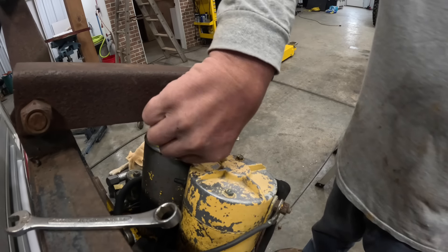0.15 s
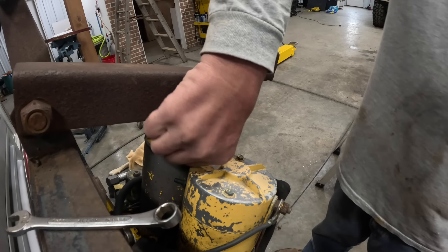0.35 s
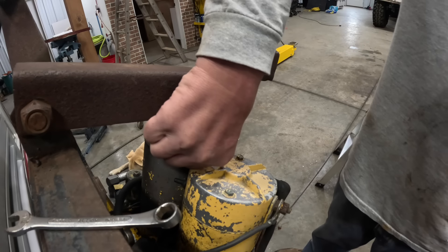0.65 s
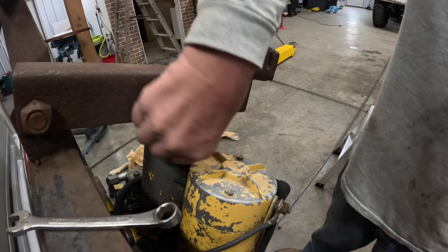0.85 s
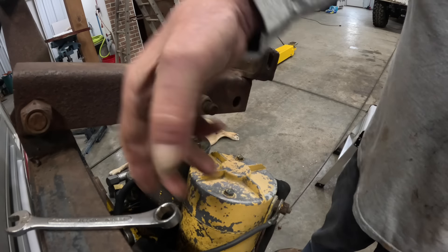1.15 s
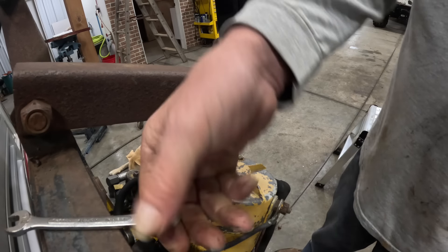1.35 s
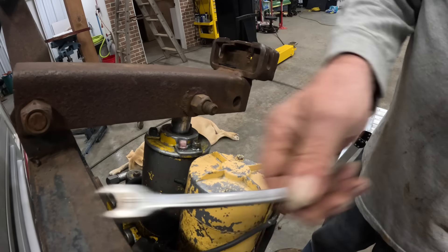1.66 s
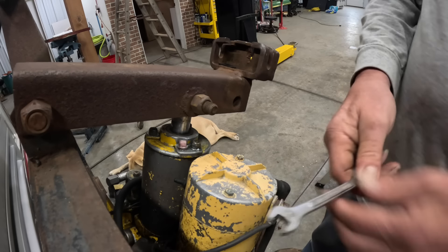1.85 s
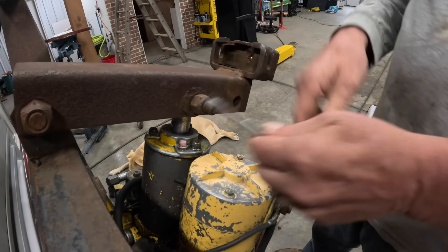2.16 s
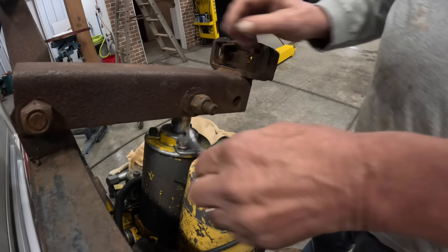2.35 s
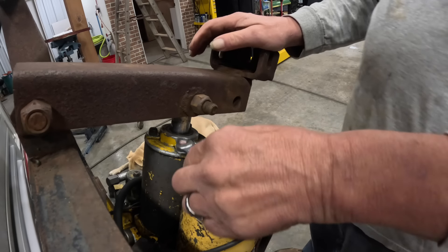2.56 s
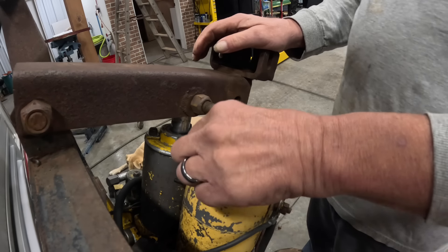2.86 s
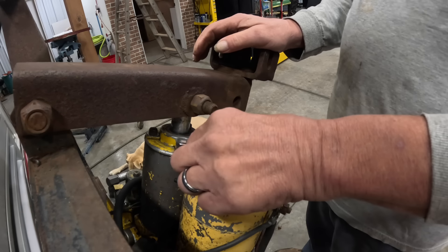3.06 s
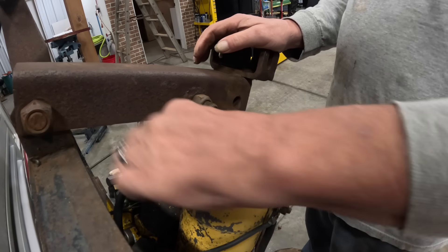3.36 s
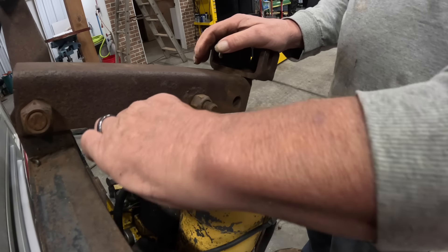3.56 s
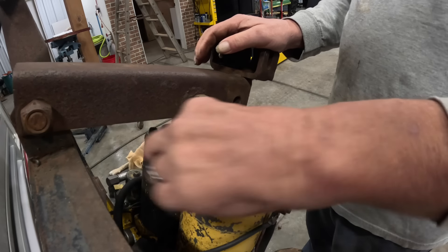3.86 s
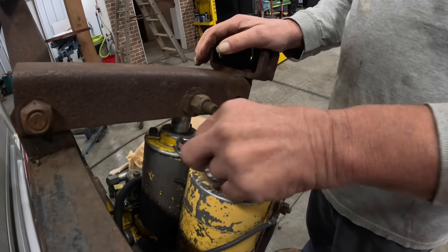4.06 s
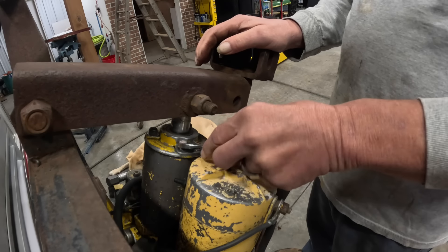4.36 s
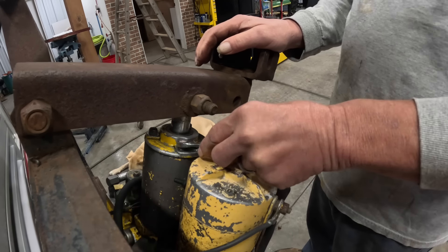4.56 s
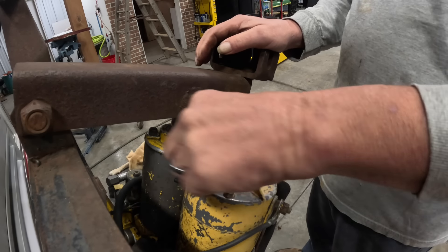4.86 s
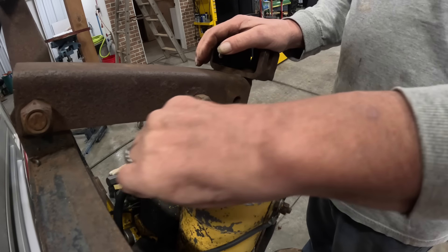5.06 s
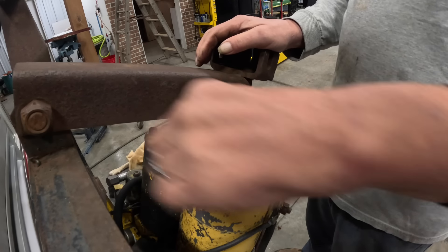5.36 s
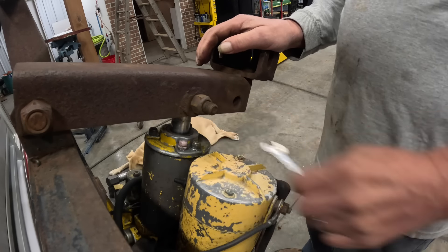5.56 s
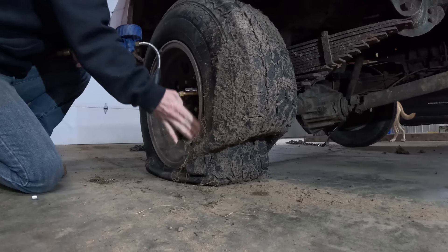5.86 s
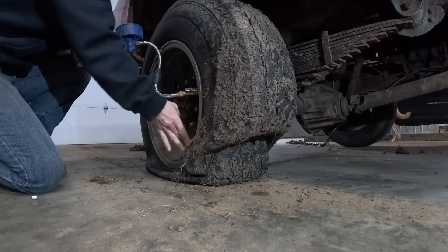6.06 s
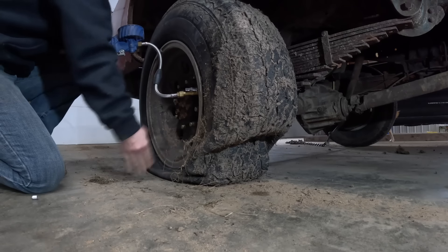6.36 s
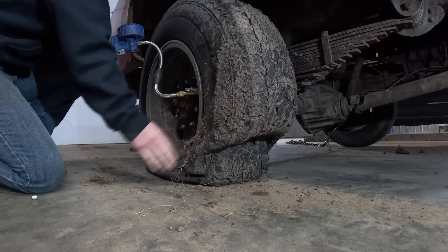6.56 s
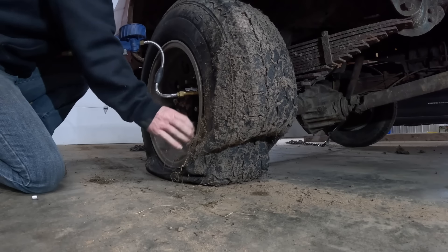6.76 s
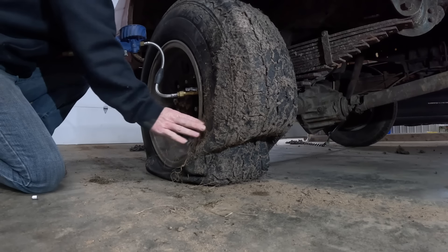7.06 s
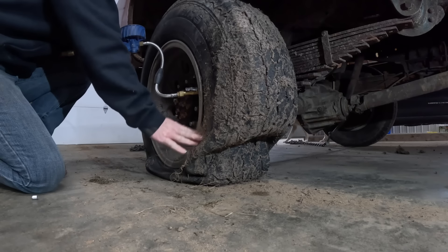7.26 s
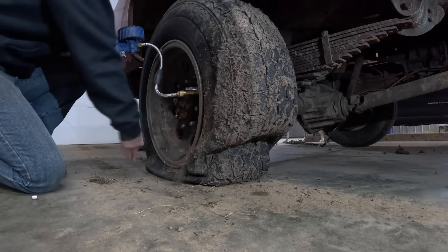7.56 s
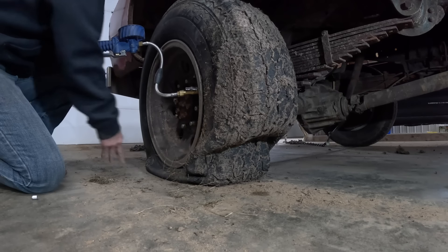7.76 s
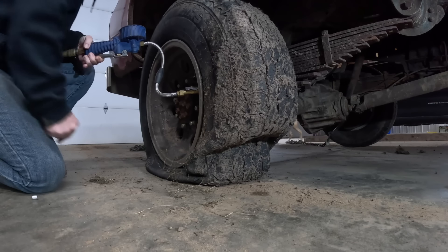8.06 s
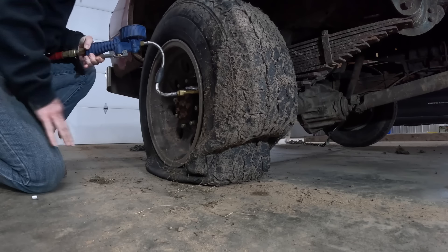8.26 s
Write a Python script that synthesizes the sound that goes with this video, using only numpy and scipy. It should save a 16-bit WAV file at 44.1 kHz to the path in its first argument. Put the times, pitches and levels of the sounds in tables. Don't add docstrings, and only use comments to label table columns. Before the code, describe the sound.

A motor hums low while hands rub and clink a steel wrench, then air spits sharply and hisses steadily into a flat tire.

```python
import sys
import numpy as np
from scipy import signal
from scipy.fft import rfft, irfft, next_fast_len
from scipy.io import wavfile

SR = 44100
rng = np.random.default_rng(int(sys.argv[2]) if len(sys.argv) > 2 else 0)


def linear_from_db(decibels):
    return 10 ** (np.asarray(decibels, float) / 20)


def unload_wav(signal):
    wavfile.write(
        sys.argv[1],
        SR,
        np.round(np.clip(np.atleast_2d(signal).T, -1, 1) * 32767).astype(np.int16),
    )


N = 371322
T = np.arange(N) / SR
CUT_S = 5.722

# [t/s, level/dB]
GUSTS = [
    (0, -47),
    (.26, -52),
    (.82, -54.5),
    (1.48, -67),
    (2.7, -57),
    (3.3, -59),
    (5.3, -63),
    (6.15, -57),
]
GUST_RISE_DB_S, GUST_FALL_DB_S, STILL_SHOP_DB, STILL_GARAGE_DB = 92, 91, -73.5, -77.5
# [f/Hz, level/dB]
SHOP_DRAUGHT = [(8, -4), (30, -1), (45, -5), (75, -2), (90, -12), (110, -16)]
GARAGE_DRAUGHT = [(8, -25.0), (30, 9.5), (50, -2.0), (100, -23.0)]
# [f/Hz, L-R level/dB]
DRAUGHT_ALIKE, DRAUGHT_LEAN = [(10, 0.91), (100, 0.9)], [(10, -1.0), (100, -2.0)]
# [f/Hz, level/dB per Hz]
GARAGE_COLOUR = [(53, -50), (90, -22), (118, -20), (157, -2.5), (195, -8.5), (251, -4.5), (265, -4.5),
                 (739, -23), (829, -6), (1100, -16), (1430, -10), (2420, -120)]
# [t/s, level/dB]
STIRS = [
    (5.8, -59),
    (7.6, -65),
]
STIR_FADE_DB_S, HUSH_DB = 17, -71.5
# [f/Hz, width/Hz, level/dB]
FAR_PUMP = (858, 12, -84)
# [f/Hz, level/dB per Hz]
SHOP_AIR = [(530, -25), (900, -17), (1040, 2), (1230, 0.5), (1590, -1), (2120, -8), (2470, -1.5),
            (3290, -1.5), (4490, -12.5), (8740, -11), (10600, -20), (12800, -19.5), (15500, -43)]
SHOP_AIR_DB, SHOP_T60_S = -69, 0.39
# [f/Hz, L-R level/dB]
SHOP_ALIKE = [(60, 0.6), (130, 1), (290, 0.77), (640, 0.1), (1410, 0.44), (3500, 0.13), (5600, 0.87),
              (9300, .97), (10800, 0.32), (15000, 0.5)]
SHOP_LEAN = [(60, 7), (180, -1.5), (550, 4), (1650, 2), (4970, 0.5), (9300, 1.5), (12000, 11), (15000, 8)]

SHAFT_HZ = 16.655
# [multiple of the shaft rate, level/dB rms]
MOTOR_LINES = [(11, -72.5), (13, -66.5), (15, -72.5), (20, -77.5), (22, -74), (24, -81.5), (30, -58),
               (33, -87), (36, -69.5), (37, -64.5), (39, -69.5), (40, -73), (41, -71.5), (45, -82.5)]
# [f/Hz, level/dB per Hz]
CASING = [(53, -43), (90, -47), (108, -20.5), (178, 3), (222, -2.5), (308, -10.5), (360, -9), (460, -10.5),
          (481, -6.5), (497, -11.5), (538, -8.5), (601, -7), (680, -13.5), (786, -26.5), (1300, -28.5),
          (1690, -65), (2860, -120)]
CASING_DB = -56
# [f/Hz, width/Hz, level/dB]
BEARING = (3390, 40, -81.5)
SHADED_S, SHADE_DB = 3.48, -1.5

# [t/s, level/dB]
DRAG = [
    (7.22, -69),
    (7.26, -55.5),
    (7.4, -49),
    (7.495, -42.5),
    (7.53, -58),
    (7.7, -91),
]
# [f/Hz, level/dB per Hz]
DRAG_COLOUR = [(65, -52), (110, -37), (156, 1), (275, -4), (322, -9), (425, -1), (499, -3), (537, -8),
               (796, -22), (915, -9.5), (1400, -15), (1820, -44), (3080, -120)]
GRIT = [(1500, -2), (3000, -5), (5000, -1.5), (9000, -1.5), (12000, -17), (15500, -19)]
# [f/Hz, L-R level/dB]
PALM_ALIKE = [(100, 1), (1500, .94), (3500, 0.88), (4500, 1), (9000, 1), (12000, .8)]
PALM_LEAN = [(100, -1), (1500, -2.5), (4500, -0.5), (9000, 1.5), (12000, 5)]

# [t/s, sleeve level/dB, fingertips against sleeve/dB, fade/dB per s]
HANDS = [
    (0, -65.5, -5.5, 60),
    (.14, -69, -14, 30),
    (.3, -64.5, -19, 33),
    (.92, -71, -4, 34),
    (1.95, -67, -3, 37),
    (2.57, -69, -4, 28),
    (3.3, -69.5, -9, 45),
    (4.2, -75.5, 0, 9.5),
    (5.65, -70, -6, 18),
]
HANDS_REST_DB = -83
# [f/Hz, level/dB per Hz]
SLEEVE = [(700, -18), (1200, -0.5), (2000, -3), (3000, -3), (4500, -12.5), (7000, -29.5)]
FINGER = [(3500, -15.5), (5500, 0), (7500, 0.5), (9000, 0.5), (10500, -19), (14000, -21)]
# [t/s, peak level/dB, centre f/Hz]
TICKS = [(0.191, -49, 1800), (0.2068, -49, 6460), (0.2072, -52, 2800), (0.758, -49.5, 7400),
         (0.95, -53, 8340), (1.4624, -46, 3000), (1.467, -52, 4500), (1.4745, -52, 6800),
         (1.488, -54, 5000), (1.925, -48.5, 8700), (3.0525, -44, 6640), (3.064, -53, 5500),
         (3.092, -57, 7500), (3.167, -61, 6500), (3.7502, -28, 2600), (4.2177, -52, 1950),
         (5.2864, -38, 2600), (4.604, -55, 4000), (7.495, -34, 3100), (7.5852, -38, 3600)]
TICK_SHARE, TICK_T60_S = 0.89, 0.025
# [t/s, peak level/dB, centre f/Hz]
KNOCKS = [(1.465, -46, 1150), (1.472, -52, 2200), (1.484, -50, 1600), (3.054, -43.5, 980),
          (3.37, -56, 1450), (3.694, -55.5, 1300), (4.05, -49, 1160), (4.248, -48, 716.8),
          (4.362, -49.5, 1250), (4.425, -50, 726), (5.225, -46, 780), (5.235, -53, 1500),
          (5.79, -48.5, 185), (5.89, -51.5, 190), (6.0, -53, 238), (7.39, -45, 220), (7.425, -42.5, 480),
          (7.484, -42, 470), (7.493, -38.5, 200), (7.495, -37, 1040), (7.817, -44.5, 1220),
          (8.39, -56.5, 190)]
KNOCK_SHARE, KNOCK_T60_S = 0.4, 0.13
# [t/s, peak level/dB, centre f/Hz]
BOOMS = [
    (2.44, -60, 1150),
    (3.06, -45, 450),
    (3.755, -48, 2700),
    (3.757, -55.5, 1400),
    (7.58, -54, 190),
]
BOOM_SHARE, BOOM_T60_S = 0.32, 0.44
# [t/s, peak level/dB, centre f/Hz]
SLIPS = [(.2085, -53, 8400), (2.875, -59, 6800), (4.078, -57, 9200), (4.104, -55, 9000), (4.122, -56, 8300),
         (4.133, -57, 9500), (4.202, -64, 9500), (4.245, -57, 8000), (4.3, -56, 9300), (4.311, -61, 9300),
         (4.322, -56, 9400), (4.34, -63, 9090), (4.502, -57, 7600), (4.52, -62, 9500), (4.543, -65, 7400),
         (4.562, -59, 7600), (4.604, -54.5, 7700)]
SLIP_SHARE, SLIP_T60_S = 0.19, .025
# [t/s, level/dB, f/Hz, length/s]
SQUEAKS = [(.955, -65, 8700, 0.027), (.2, -63, 8500, 0.032), (2.3, -70, 1900, 0.099),
           (2.94, -62.5, 1190, 0.11), (3.1, -66.5, 1230, 0.17), (2.795, -61.5, 8300, 0.026),
           (2.85, -63.5, 8400, 0.051), (3.67, -71, 9300, .033), (4.5, -70, 9130, 0.035),
           (4.32, -71, 9200, 0.04), (2.6, -63, 1840, .03), (2.8, -64, 1340, .03), (2, -70, 1900, .05),
           (5.212, -72, 8600, .015)]
# [t/s, level/dB, f/Hz, length/s]
SCUFFS = [
    (.47, -68, 2890, 0.078),
    (.9, -62, 2460, 0.045),
    (1.478, -67, 5000, 0.041),
    (1.17, -71, 7900, 0.13),
    (1.95, -68, 3460, 0.13),
    (2.17, -71.5, 7000, 0.062),
    (2.28, -69.5, 7200, 0.08),
    (2.6, -66, 2440, 0.057),
    (4.52, -72.5, 8700, 0.05),
]
SQUEAK_SHARE, SCUFF_SHARE = 0.17, 0.71
# [t/s, level/dB, f/Hz, length/s]
WHISTLES = [
    (.34, -75, 7500, 0.055),
    (.885, -68, 7440, 0.041),
    (2.6, -62.5, 7500, 0.057),
    (2.58, -71, 6100, .03),
    (2.93, -70, 1170, .08),
]
WHISTLE_SHARE = 0.035
# [t/s, level/dB, f/Hz, t60/s]
THUDS = [(1.463, -48, 850, .07), (1.464, -51, 1550, 0.081), (1.464, -55, 2864, .03),
         (1.47, -47, 878, 0.065), (1.476, -47, 1986, .03), (1.486, -48, 800, .04),
         (2.773, -52, 1280, 0.046), (3.053, -41, 800, .04), (3.053, -47, 1320, 0.042),
         (3.053, -51, 1800, .03), (3.054, -40, 530, .05), (3.068, -40, 497, 0.065),
         (3.063, -40.5, 756, 0.082), (3.097, -46, 497, 0.12), (3.1, -45, 179, .25),
         (7.492, -33.5, 950, 0.049), (7.4905, -28.5, 490, .045), (7.496, -42, 1400, .04),
         (3.165, -48, 590, .04), (3.7423, -38.5, 1346, .025), (3.7418, -38, 2230, .022),
         (3.7503, -29, 2260, .024), (4.0465, -51, 2261, .025), (5.2865, -32, 2220, .026)]
# [t/s, level/dB, f/Hz, length/s]
HELD = [
    (4.0458, -42, 3550, 0.019),
    (5.2875, -39, 3544, 0.01),
]
HELD_T60_S, GRIP_S = .1, .003

# [t/s, peak level/dB, free ring/dB, crack/dB]
CLINKS = [(2.773, -50, -28, -5), (3.6945, -51, -24, -12), (3.7164, -52., -29, -14.),
          (3.7416, -18, -33, -24), (3.7501, -11.5, -37, -12.5), (3.7535, -23, -21, -2),
          (3.7824, -42.5, -2.5, -20), (4.0457, -43, -28, -4), (4.0554, -46., -24, -5),
          (4.3615, -41.5, -37.5, -10), (5.223, -31.5, -36, -12), (5.2394, -52, -25, -15),
          (5.2862, -26, -37.5, -1.5)]
# [f/Hz, level/dB, t60/s]
GRIPPED = [(1350, -12.5, 0.066), (2260, -9, 0.031), (3550, 3, 0.032), (6790, 4.5, 0.02),
           (8510, -22.5, 0.0093), (11900, -19.5, 0.011), (12300, -35, 0.013)]
FREE = [(2940, -18, .3), (3515, -27, .6), (3570, -25, .15), (6385, -10, .8), (6700, -11, .25),
        (6810, -13, .35), (7040, -11, .12)]
CONTACT_S = 0.0026
EVEN_BLOW_DB, BRIGHTER_PER_DB = -35, 0.4423
# [t/s, level/dB, f/Hz, t60/s]
PINGS = [(1.463, -60, 11550, .06), (1.463, -62, 12500, .05), (1.466, -62, 5760, .04),
         (1.472, -60, 7380, .05), (1.476, -72, 11550, 0.17), (3.053, -57, 6700, .05),
         (3.055, -57, 3500, .05), (3.7503, -37.5, 2500, 0.02), (3.753, -43.5, 4716, 0.2),
         (3.7505, -29, 5980, 0.028), (3.751, -32, 9090, .015), (3.7565, -30.5, 6350, 0.055),
         (3.7504, -38, 2970, .03), (5.2864, -39, 2935, 0.025), (5.3, -58.5, 6385, 0.66),
         (5.24, -55, 3550, .05), (5.25, -60, 6820, .1), (3.6985, -54.5, 3545, .06), (3.77, -55, 6385, .9),
         (3.76, -58, 3521, 0.73), (4.0462, -64, 11430, .045), (4.0462, -66, 12560, .06),
         (4.05, -68, 3520, 0.51), (5.3, -34, 5782, .012), (5.2863, -24.5, 10950, 0.011),
         (5.2863, -26.5, 8300, 0.014), (5.2864, -33, 12300, .016), (5.294, -44, 8000, .012),
         (5.2864, -37, 7360, .03), (5.2864, -29.5, 6551, .035), (5.295, -47, 4730, .04)]

# [f/Hz, level/dB per Hz]
LEAK = [(290, -50), (500, -18.5), (941, -26), (1170, -5.5), (1390, -7.5), (2290, -5.5), (2880, -4),
        (3100, -2), (3420, -1), (3730, -1), (5740, -10), (7550, -5), (8840, -12), (10800, -31),
        (15500, -32)]
FILL = [(410, -62), (700, -22), (828, -41), (993, -16.5), (1560, -1), (1710, -3), (2130, -0.5), (2460, -3),
        (2800, -6), (3140, -6), (7690, -3.5), (8980, -4), (10600, -19.5), (12300, -19.5), (15500, -31)]
# [f/Hz, width/Hz, level/dB]
TIRE = [(1534, 22, -19), (2047, 26, -19), (2154, 9.3, -18.5), (2742, 17, -17), (3083, 53, -20),
        (3470, 80, -29)]
# [f/Hz, L-R level/dB]
AIR_ALIKE = [(60, 0.9), (130, 0.78), (290, 0.48), (640, 0.64), (1410, 0.95), (3300, 0.91), (4300, 0.99),
             (9600, 0.99), (11500, 0.86), (15000, .5)]
AIR_LEAN = [(60, 4), (180, -5), (550, -5), (1650, -1.5), (3300, -2.5), (4300, 0), (9600, -0.5), (11500, 4),
            (15000, 3)]
LEAK_DB, SEATED_S, SEATING_DB_S = -39, 5.98, 17.5
FLOW_DB, FLOW_GROWS_DB_S = -52.5, 1.5
FILL_SHARE, SHARE_LOST_PER_DB = 0.78, 0.12
# [t/s, level/dB]
SURGES = [
    (5.72, -39),
    (5.888, -29),
    (5.99, -33.5),
]
SURGE_RISE_DB_S, SURGE_FALL_DB_S = 303, 323
# [t/s, level/dB, centre f/Hz, length/s]
SPITS = [
    (5.789, -31.5, 6200, .0036),
    (5.877, -27, 4300, 0.0092),
    (5.88, -27.5, 2760, 0.01),
    (5.879, -29, 6730, 0.011),
    (5.89, -27, 4540, 0.0047),
    (5.89, -31.5, 6800, 0.0078),
    (5.979, -33, 2120, 0.014),
    (6.004, -33, 4900, .005),
    (6.003, -36, 7600, .006),
]
# [t/s, level/dB, centre f/Hz, length/s]
BLASTS = [
    (5.755, -38, 3970, 0.045),
    (5.868, -32.5, 3400, 0.028),
    (5.96, -36.5, 3460, 0.066),
    (6.002, -27.5, 2270, 0.0074),
    (6.4, -52, 3520, 0.4),
]
SPIT_SHARE, BLAST_SHARE = 0.24, 0.7
# [t/s, peak level/dB]
POPS = [(5.7894, -25), (5.86, -20), (5.8649, -16), (5.8708, -16), (5.8748, -14), (5.8755, -15),
        (5.8781, -10), (5.8804, -10), (5.8888, -11), (5.8897, -9), (5.8954, -17), (6.005, -22)]
# [t/s, level/dB, from f/Hz, to f/Hz, length/s]
GLIDES = [(5.73, -43, 4500, 3900, .06), (5.862, -36, 3300, 2750, .024), (5.893, -34.5, 2150, 1700, .022),
          (5.912, -40, 1700, 1380, .038), (5.945, -41, 1350, 1000, .055), (5.9, -33.5, 4700, 4350, .017),
          (5.95, -36, 3200, 2500, .022), (5.968, -30.5, 2450, 1950, .022), (5.902, -35, 3680, 3600, .017),
          (5.916, -34, 3060, 3180, .024), (5.975, -31.5, 3130, 3040, .02), (5.948, -37, 2300, 2230, .014),
          (5.948, -39, 1480, 1560, .014), (5.968, -37, 1780, 1650, .016)]
GLIDE_WAVER_HZ = 110

# [f/Hz, L-R level/dB]
BENCH_LEAD = [(200, 1.5), (500, 0), (1000, 0.5), (2000, 1.5), (3600, 0.5), (5500, 0.5), (9000, -0.1),
              (12000, 1.5)]
BENCH_LEAN = [(500, -5), (1000, -3.5), (2000, 1), (3600, 0.5), (6500, 1), (9000, 2.5), (11500, 8.5),
              (14000, 10.5)]
VALVE_LEAD = [(500, .1), (1000, -0.25), (2000, -0.32), (3300, -0.41), (4400, 0), (12000, 0)]
VALVE_LEAN = [(500, -2), (2000, -1.5), (3300, -1.2), (4400, 0), (12000, 0)]
CUTOFF_HZ = 16300


def rms_one(x):
    return x / np.sqrt(np.mean(x ** 2) + 1e-20)


def at_hz(points, hz):
    f, value = np.transpose(points)
    return np.interp(np.log(hz + 1e-9), np.log(f), value)


def drift(rate, size):
    r = np.exp(-80 * np.pi * rate / SR)
    slow = signal.lfilter([1], [1, -2 * r, r * r], rng.standard_normal(size // 40 + 2002))[2000:]
    return np.interp(np.arange(size) / 40, np.arange(len(slow)), rms_one(slow))


def swells(s, db, rise, fall, rest_db):
    late = np.arange(0, N + 40, 40)[:, None] / SR - s
    each = db - np.where(late < 0, -late * rise, late * fall)
    total = 10 * np.log10(np.sum(linear_from_db(2 * each), axis=1) + linear_from_db(2 * rest_db))
    return np.interp(np.arange(N) / 40, np.arange(len(late)), total)


def noise(spectrum, span, alike, lean, patchy_db):
    start, stop = (min(N, round(s * SR)) for s in span)
    size = next_fast_len(stop - start)
    hz = np.arange(size // 2 + 1) * SR / size
    mid, side = rfft(rng.standard_normal((2, size)))
    c = np.clip(at_hz(alike, hz), 0, 1)
    pair = np.sqrt(1 + c) * mid + np.sqrt(1 - c) * side * [[1], [-1]]
    low, high = spectrum[0][0], spectrum[-1][0]
    inside = (hz > low) & (hz < high)
    pair = pair * inside * linear_from_db(at_hz(spectrum, hz) + at_hz(lean, hz) * np.array([[.5], [-.5]]))
    octave, together, sound = np.log2(hz + 1), drift(8.2, size), 0
    for k in range(int(np.log2(low)), int(np.log2(high)) + 2):
        band = irfft(pair * np.clip(1 - abs(octave - k), 0, 1), size)
        sound = sound + band * linear_from_db(patchy_db * (0.72 * together + drift(19.4, size)))
    out = np.zeros((2, N))
    out[:, start:stop] = rms_one(sound)[:, :stop - start]
    return out


def ring(clicks, hz, t60):
    r, w = linear_from_db(-60 / (t60 * SR)), 2 * np.pi * hz / SR
    return signal.lfilter([0, np.sin(w)], [1, -2 * r * np.cos(w), r * r], clicks + 1e-18)


def narrow(x, hz, width):
    r = np.exp(-np.pi * width / SR)
    poles = [1, -2 * r * np.cos(2 * np.pi * hz / SR), r * r]
    return signal.lfilter(np.array([1, 0, -1]) * (1 - r * r) / 2, poles, x)


def breathy_tone(hz, width, db):
    return linear_from_db(db) * rms_one(narrow(narrow(rng.standard_normal(N), hz, width), hz, width))


def bandpass(order, low, high):
    return signal.butter(order, [low, high], "band", fs=SR, output="sos")


def add(out, s, piece):
    i = round(s * SR)
    out[i:i + len(piece)] += piece[:N - i]


def contacts(rows, share, t60):
    out, t = np.zeros(N), np.arange(SR // 4) / SR
    for s, db, hz in rows:
        burst = rng.standard_normal(len(t)) * linear_from_db(-60 * t / t60) * np.minimum(1, t / 0.001)
        burst = narrow(narrow(burst, hz, share * hz), hz, 2 * share * hz)
        add(out, s, linear_from_db(db) * burst / abs(burst).max())
    return out


def puffs(rows, share):
    out, t = np.zeros(N), np.arange(SR // 2) / SR - .25
    for s, db, hz, length in rows:
        body = narrow(narrow(rng.standard_normal(SR // 2), hz, share * hz), hz, share * hz)
        swell = linear_from_db(db) * rms_one(body) * np.exp(-3 * (t / length) ** 2)
        start = round(s * SR) - SR // 4
        skip = max(0, -start)
        add(out, (start + skip) / SR, swell[skip:])
    return out


def ports(x, lead, lean):
    size = next_fast_len(N)
    hz = np.arange(size // 2 + 1) * SR / size
    half = np.array([[.5], [-.5]])
    turn = linear_from_db(half * at_hz(lean, hz)) * np.exp(1j * half * at_hz(lead, hz))
    return irfft(rfft(x, size) * turn, size)[:, :N]


def draught():
    shop = noise(SHOP_DRAUGHT, (0, CUT_S), DRAUGHT_ALIKE, DRAUGHT_LEAN, patchy_db=2.5)
    deep = noise(GARAGE_DRAUGHT, (CUT_S, 9), DRAUGHT_ALIKE, DRAUGHT_LEAN, patchy_db=4.5)
    gusts = *np.transpose(GUSTS), GUST_RISE_DB_S, GUST_FALL_DB_S
    return linear_from_db(swells(*gusts, STILL_SHOP_DB)) * shop + linear_from_db(swells(*gusts, STILL_GARAGE_DB)) * deep


def garage_murmur():
    level_db = swells(*np.transpose(STIRS), STIR_FADE_DB_S, STIR_FADE_DB_S, HUSH_DB)
    hush = linear_from_db(level_db) * noise(GARAGE_COLOUR, (5.7, 9), AIR_ALIKE, AIR_LEAN, patchy_db=1.0)
    return hush + breathy_tone(*FAR_PUMP)


def shop_air():
    return linear_from_db(SHOP_AIR_DB) * noise(SHOP_AIR, (0, 6), SHOP_ALIKE, SHOP_LEAN, patchy_db=1.4)


def shop_room(x):
    t = np.arange(SR // 2) / SR
    tail = rng.standard_normal((2, len(t))) * linear_from_db(-60 * t / SHOP_T60_S) * (t > .006)
    mid, side = signal.sosfilt(signal.butter(3, 6500, fs=SR, output="sos"), tail)
    side = signal.sosfilt(signal.butter(4, 4500, fs=SR, output="sos"), side)
    echo = (mid + 0.6 * side * [[1], [-1]]) / np.sqrt(SR / 20)
    return signal.fftconvolve(x[None], echo, axes=1)[:, :N]


def motor():
    turn = 2 * np.pi * SHAFT_HZ * np.cumsum(1 + 0.00085 * drift(0.36, N)) / SR
    lines = np.zeros(N)
    for multiple, db in MOTOR_LINES:
        level = np.sqrt(2) * linear_from_db(db + 1.7 * drift(1.9, N))
        lines += level * np.sin(multiple * turn + rng.uniform(0, 2 * np.pi))
    casing = linear_from_db(CASING_DB) * noise(CASING, (0, 6), SHOP_ALIKE, SHOP_LEAN, patchy_db=2.0)
    whine = breathy_tone(*BEARING) * [[1.4], [0.3]]
    return lines * linear_from_db(np.array([[1.5], [-1.5]])) + whine + casing


def drag():
    scuff = noise(DRAG_COLOUR, (7.2, 7.7), PALM_ALIKE, PALM_LEAN, patchy_db=.7) * linear_from_db(1.2 * drift(35, N))
    grit = linear_from_db(-2.5) * noise(GRIT, (7.2, 7.7), PALM_ALIKE, PALM_LEAN, patchy_db=0.5)
    return linear_from_db(np.interp(T, *np.transpose(DRAG))) * (scuff + grit)


def hands():
    s, db, tips_db, fade = np.transpose(HANDS)
    sleeve = linear_from_db(swells(s, db, fade, fade, HANDS_REST_DB))
    finger = linear_from_db(swells(s, db + tips_db, fade, fade, HANDS_REST_DB))
    cloth = sleeve * noise(SLEEVE, (0, 6), SHOP_ALIKE, SHOP_LEAN, patchy_db=1.5)
    return cloth + finger * noise(FINGER, (0, 6), SHOP_ALIKE, SHOP_LEAN, patchy_db=3.0)


def thuds():
    out, t = np.zeros(N), np.arange(SR // 4) / SR
    for s, db, hz, t60 in THUDS:
        add(out, s, linear_from_db(db - 60 * t / t60) * np.sin(2 * np.pi * hz * t) * np.minimum(1, t * hz))
    for s, db, hz, length in HELD:
        stopped = np.exp(-np.maximum(t - length, 0) / GRIP_S)
        add(out, s, linear_from_db(db - 60 * t / HELD_T60_S) * np.sin(2 * np.pi * hz * t) * stopped)
    return out


def touch():
    taps = contacts(TICKS, TICK_SHARE, TICK_T60_S) + contacts(KNOCKS, KNOCK_SHARE, KNOCK_T60_S)
    taps = taps + contacts(BOOMS, BOOM_SHARE, BOOM_T60_S) + contacts(SLIPS, SLIP_SHARE, SLIP_T60_S)
    grain = linear_from_db(2.2 * drift(120, N))
    rubs = grain * (puffs(SQUEAKS, SQUEAK_SHARE) + puffs(SCUFFS, SCUFF_SHARE))
    whole = taps + thuds() + rubs + puffs(WHISTLES, WHISTLE_SHARE)
    return signal.sosfilt(bandpass(4, 125, 10500), whole)


def wrench():
    s, db, free_db, crack_db = np.transpose(CLINKS)
    bright_db = BRIGHTER_PER_DB * (db - EVEN_BLOW_DB)
    at, out = np.round(s * SR).astype(int), np.zeros(N)
    for modes, level_db, waver_db, tilt in ((GRIPPED, db - 9.0, 0, 1), (FREE, db + free_db - 9.0, 4.5, 2)):
        for hz, mode_db, t60 in modes:
            blow_db = level_db + mode_db + tilt * bright_db * np.log2(hz / 5000)
            clicks = np.zeros(N)
            clicks[at] = linear_from_db(blow_db) * rng.uniform(.75, 1.25, len(at))
            mode = ring(clicks, hz, t60) - ring(clicks, hz, CONTACT_S)
            out += mode * linear_from_db(waver_db * drift(45, N))
    for when, level_db in zip(s, db + crack_db):
        crack = rng.standard_normal(1500) * linear_from_db(-60 * np.arange(1500) / SR / 0.025)
        add(out, when, linear_from_db(level_db) * narrow(crack, 6200, 7600))
    for when, ping_db, hz, t60 in PINGS:
        note = ring(linear_from_db(ping_db) * signal.unit_impulse(SR // 2), hz, t60)
        add(out, when, note * linear_from_db(2.5 * drift(90, SR // 2)))
    return signal.sosfilt(bandpass(7, 1000, 13000), out)


def glides():
    out = np.zeros(N)
    for s, db, from_hz, to_hz, length in GLIDES:
        part = np.arange(round(length * SR)) / (length * SR)
        flutter = 1 + .012 * drift(GLIDE_WAVER_HZ, len(part))
        pitch = flutter * from_hz * (to_hz / from_hz) ** part
        tone = np.sin(2 * np.pi * np.cumsum(pitch) / SR)
        level = linear_from_db(db + 2.5 * drift(GLIDE_WAVER_HZ, len(part)))
        add(out, s, level * tone * np.sqrt(np.sin(np.pi * part)))
    return out


def spits():
    out = puffs(SPITS, SPIT_SHARE) + puffs(BLASTS, BLAST_SHARE) + glides()
    t = np.arange(-30, 60) / SR
    pop = np.cos(2 * np.pi * 3600 * t) * np.exp(-(t / .0001) ** 2)
    for s, db in POPS:
        add(out, s - 30 / SR, linear_from_db(db) * pop)
    return signal.sosfiltfilt(bandpass(2, 900, 11000), out)


def air():
    leak_db = LEAK_DB - SEATING_DB_S * np.maximum(T - SEATED_S, 0)
    flow_db = FLOW_DB + FLOW_GROWS_DB_S * (T - SEATED_S)
    surge_db = swells(*np.transpose(SURGES), SURGE_RISE_DB_S, SURGE_FALL_DB_S, -120)
    db = 10 * np.log10(linear_from_db(2 * leak_db) + linear_from_db(2 * flow_db) + linear_from_db(2 * surge_db))
    fills = np.clip(FILL_SHARE - SHARE_LOST_PER_DB * (db - flow_db), 0, 1)
    leak = noise(LEAK, (5.7, 9), AIR_ALIKE, AIR_LEAN, patchy_db=.4)
    fill = noise(FILL, (5.7, 9), AIR_ALIKE, AIR_LEAN, patchy_db=.3)
    whistles = sum(breathy_tone(*row) for row in TIRE)
    return linear_from_db(db) * (np.sqrt(1 - fills) * leak + np.sqrt(fills) * fill + whistles)


def scene():
    later = np.clip((T - CUT_S) / .008, 0, 1)
    shade = linear_from_db(SHADE_DB * np.clip(10 * (T - SHADED_S), 0, 1))
    steel, skin = wrench(), touch()
    shop = shade * motor() + shop_air() + hands()
    shop = shop + linear_from_db(-12.5) * shop_room(steel) + ports(steel + skin, BENCH_LEAD, BENCH_LEAN)
    floor = garage_murmur() + drag() + air() + ports(skin + spits(), VALVE_LEAD, VALVE_LEAN)
    return (1 - later) * shop + later * floor + draught()


def band_limit(x):
    return signal.sosfilt(signal.butter(12, 15620, fs=SR, output="sos"), x)


def record(dry):
    soft = signal.sosfilt(signal.butter(2, 13000, fs=SR, output="sos"), dry)
    mix = signal.sosfilt(signal.cheby2(12, 60, CUTOFF_HZ, fs=SR, output="sos"), soft)
    return band_limit(mix)


dry = scene()
out = record(dry)
unload_wav(out)
```